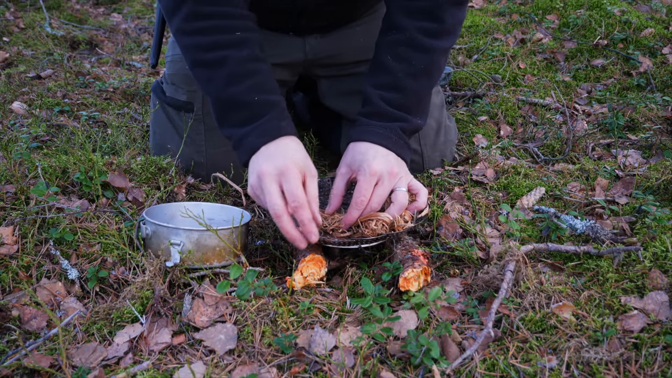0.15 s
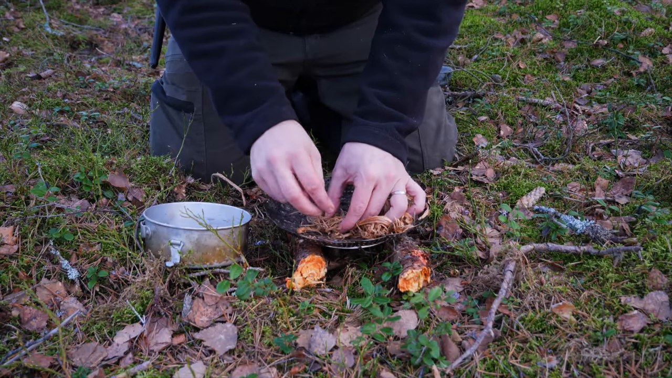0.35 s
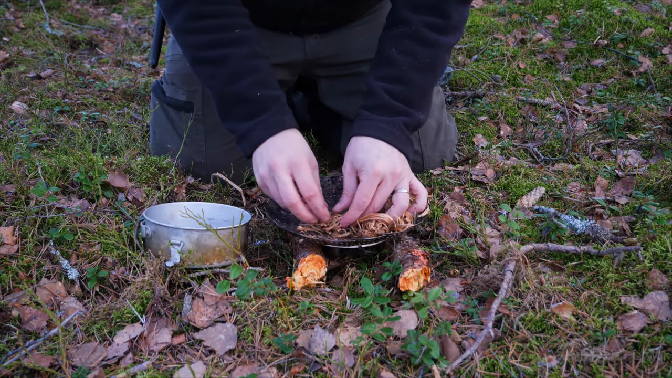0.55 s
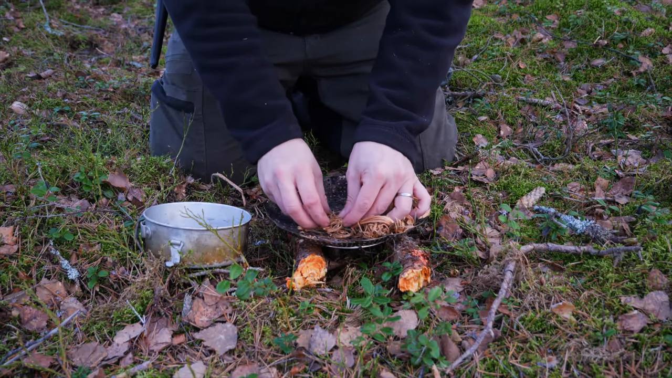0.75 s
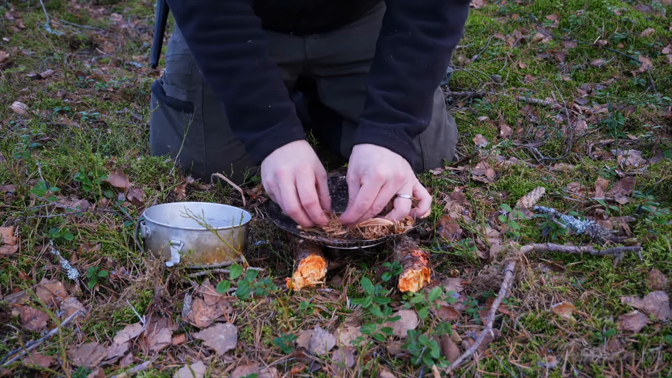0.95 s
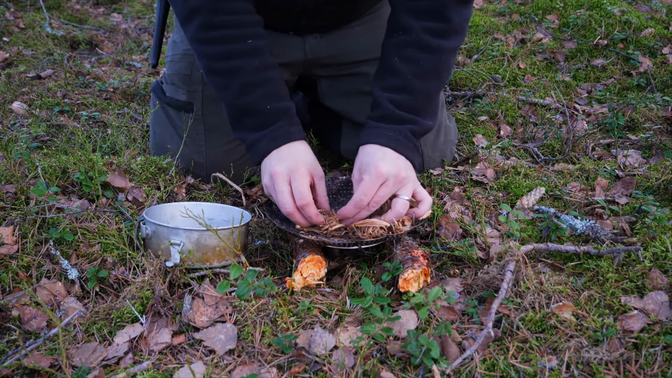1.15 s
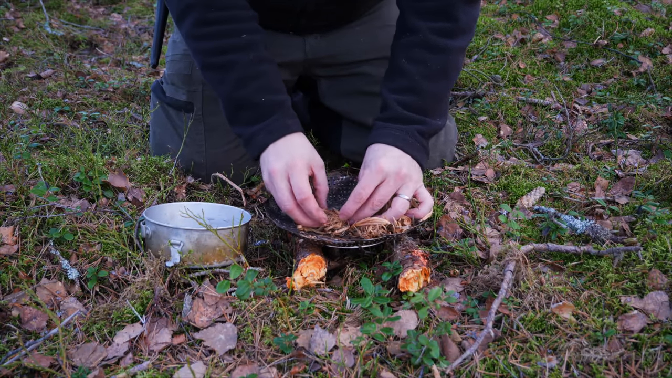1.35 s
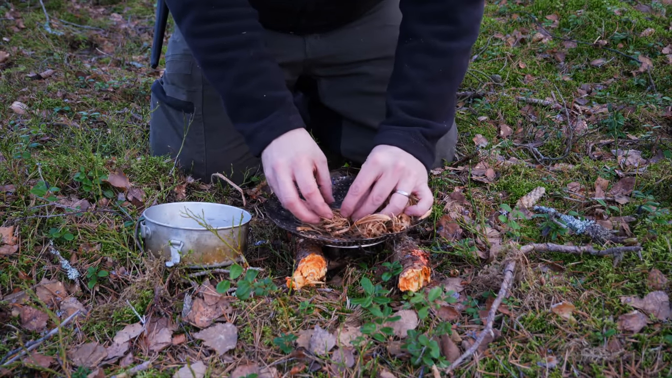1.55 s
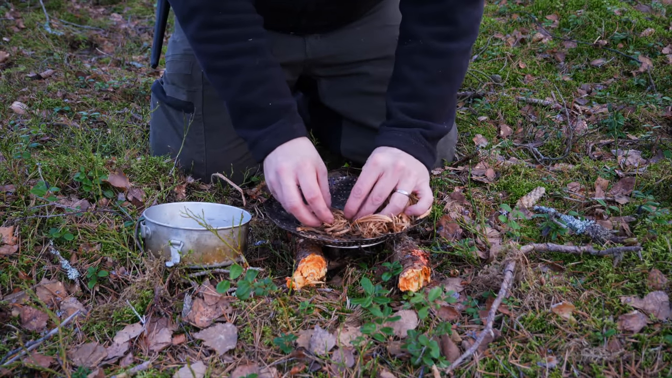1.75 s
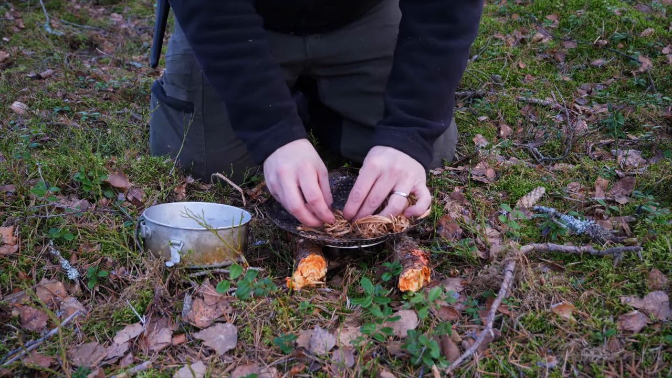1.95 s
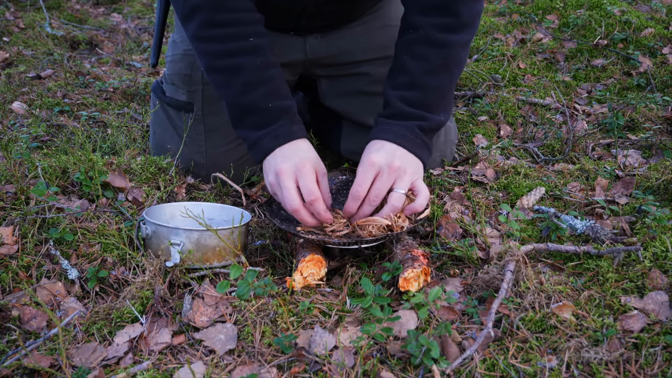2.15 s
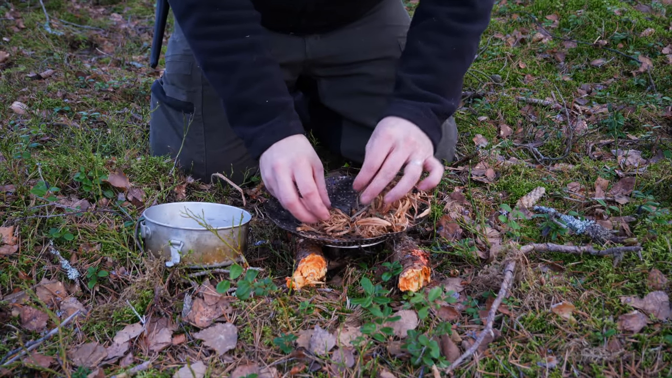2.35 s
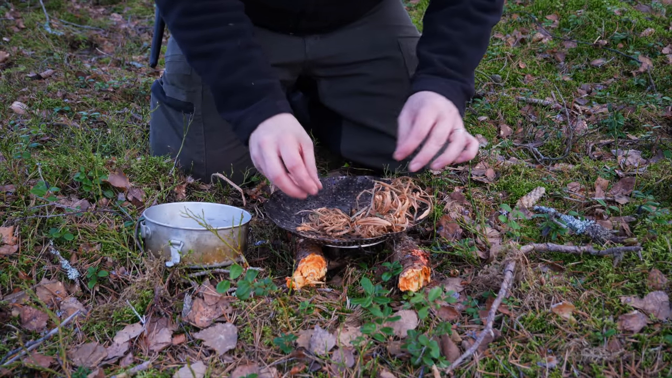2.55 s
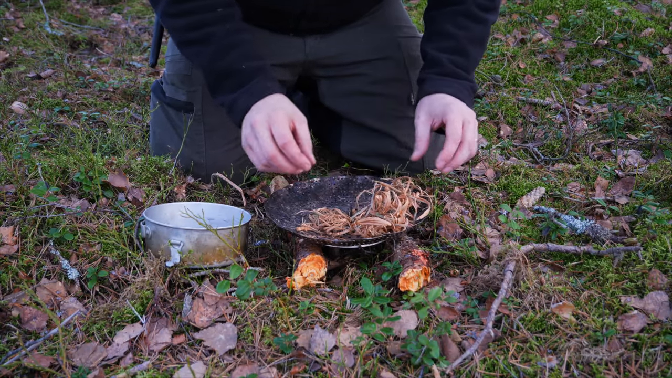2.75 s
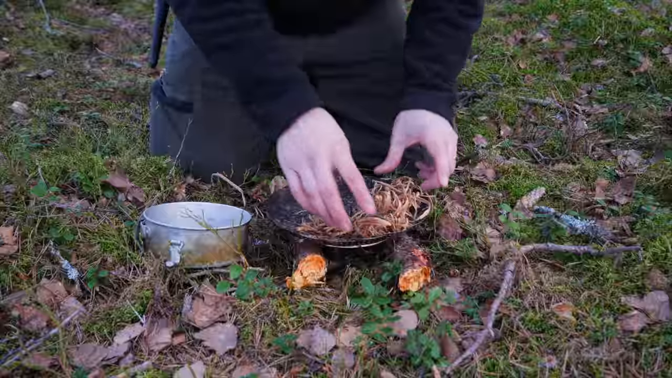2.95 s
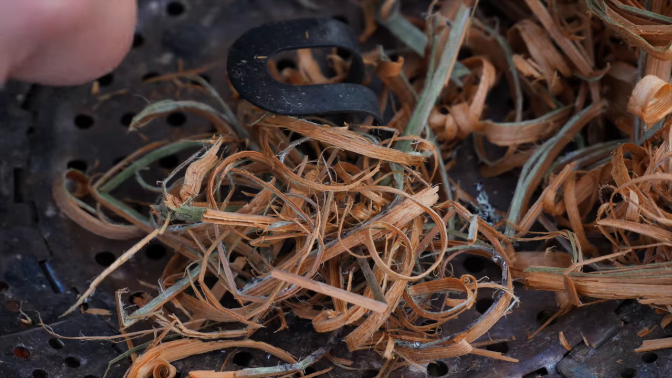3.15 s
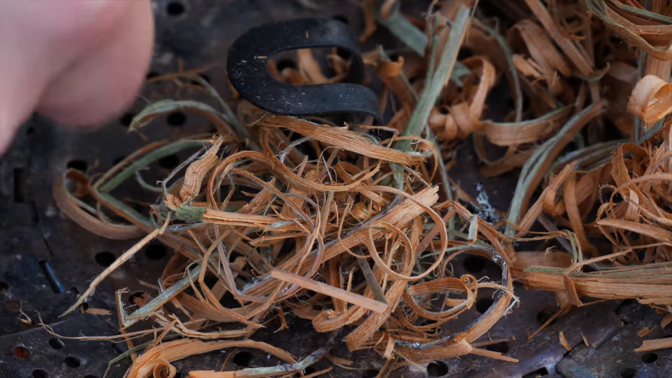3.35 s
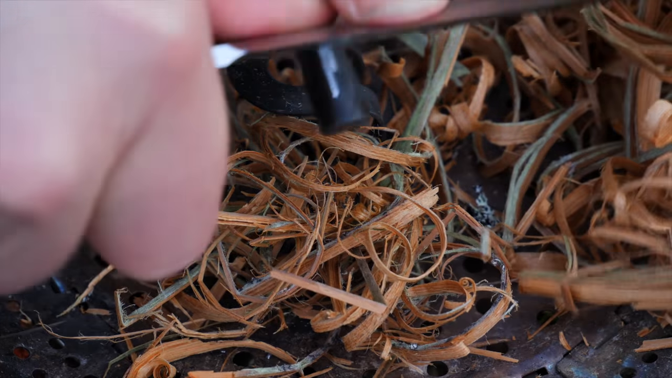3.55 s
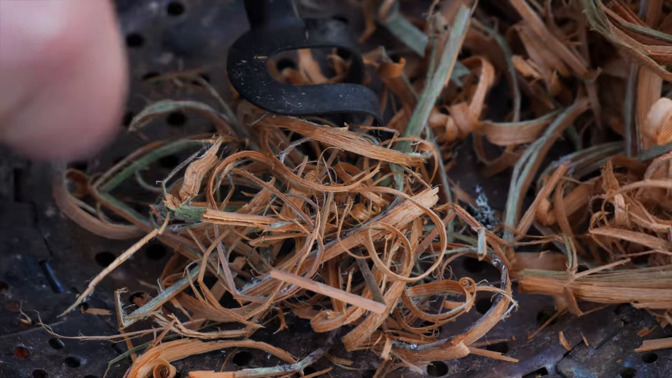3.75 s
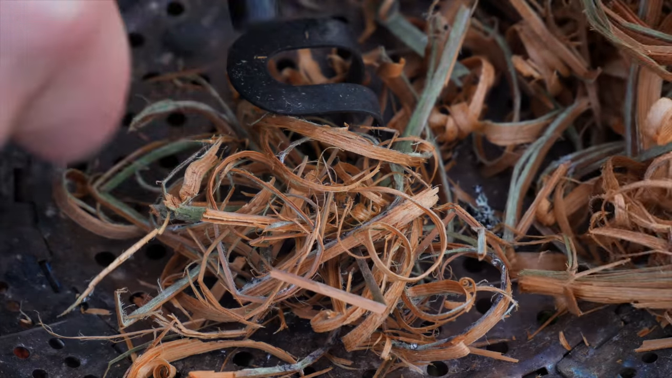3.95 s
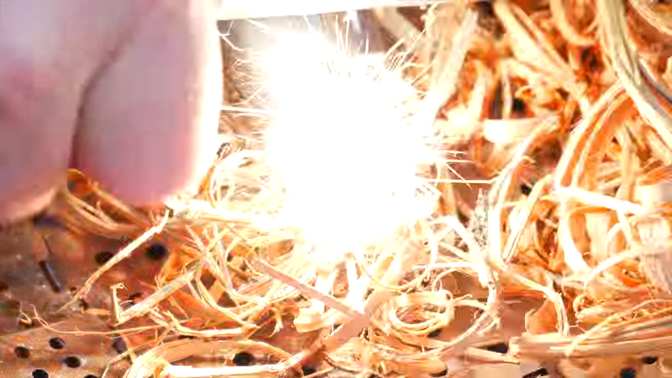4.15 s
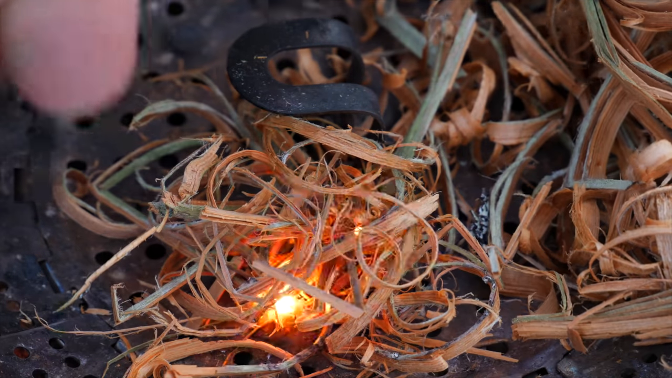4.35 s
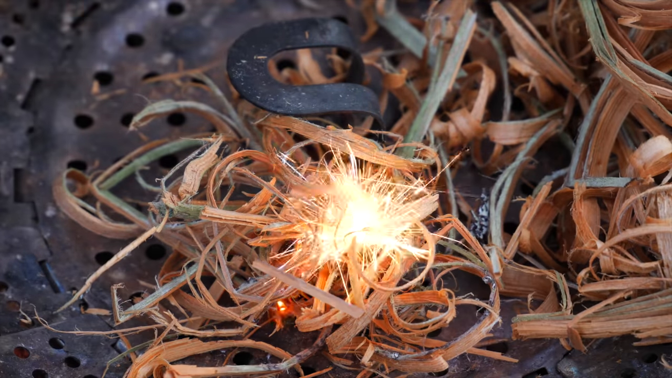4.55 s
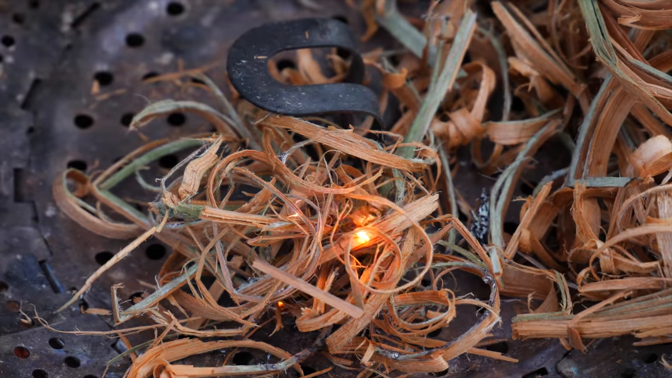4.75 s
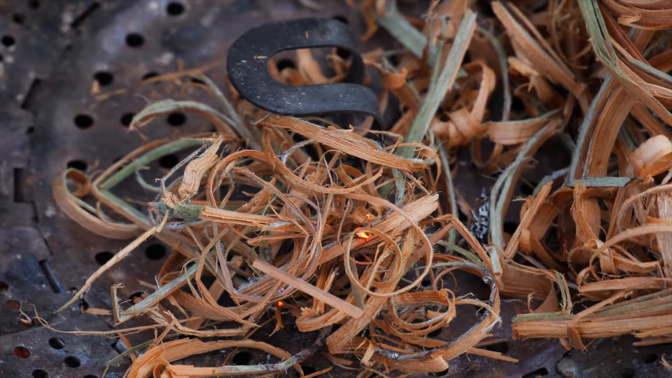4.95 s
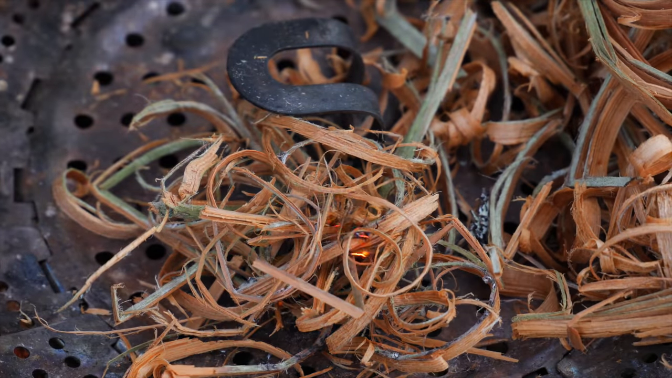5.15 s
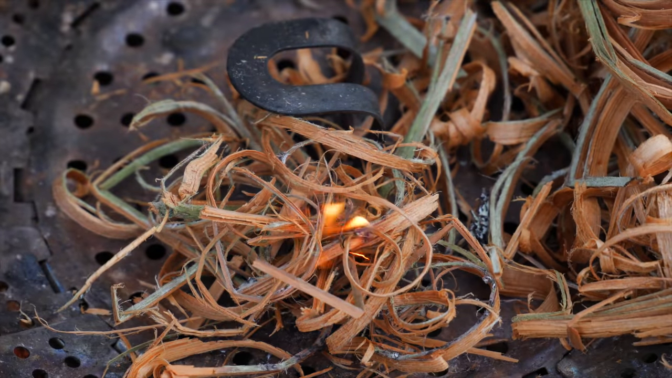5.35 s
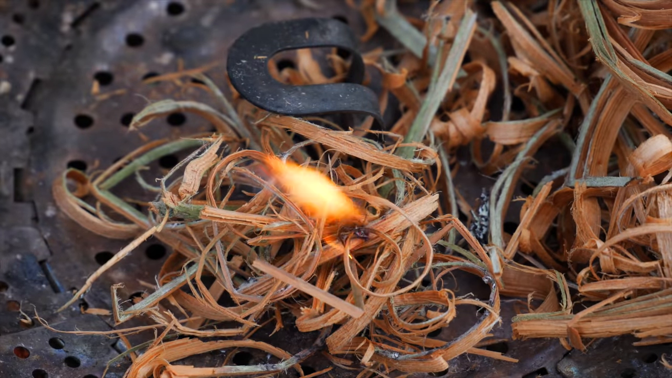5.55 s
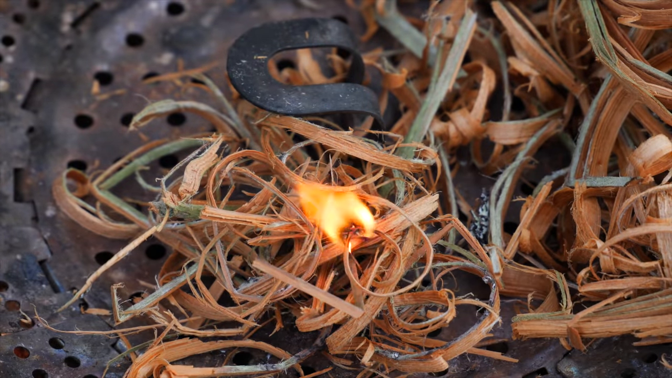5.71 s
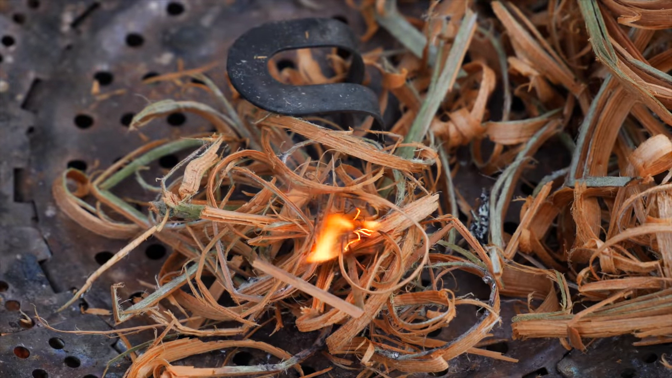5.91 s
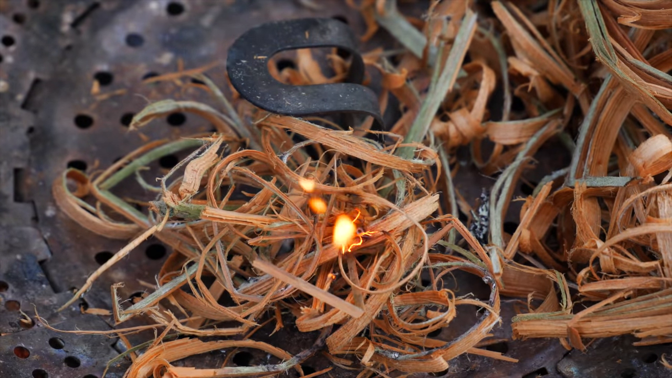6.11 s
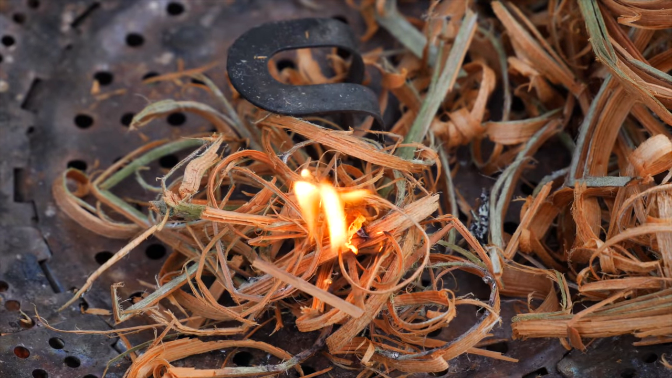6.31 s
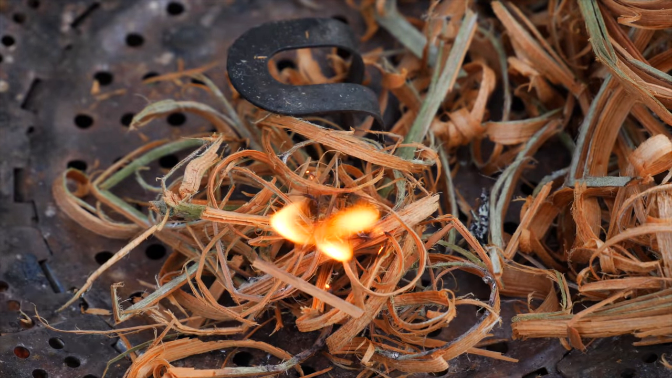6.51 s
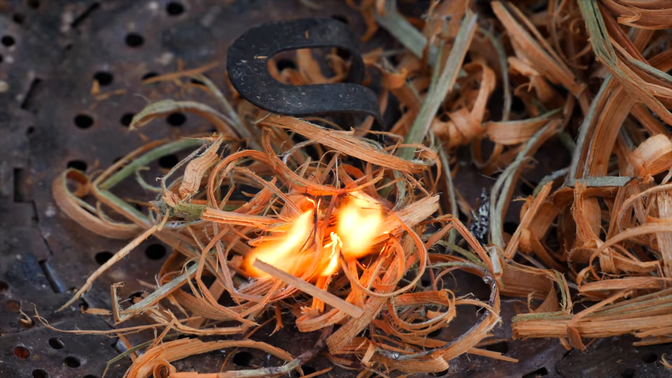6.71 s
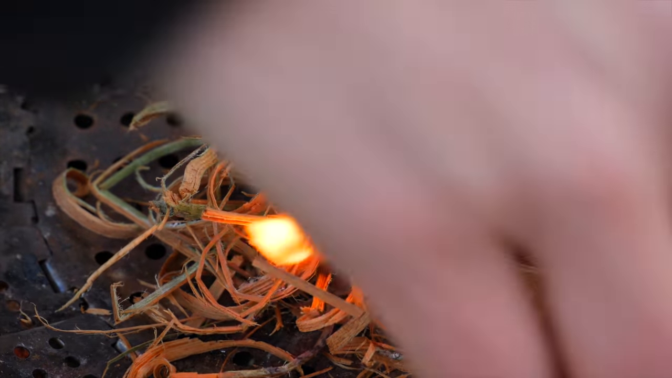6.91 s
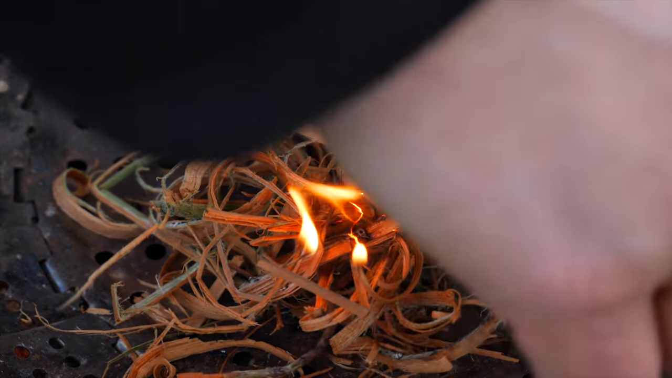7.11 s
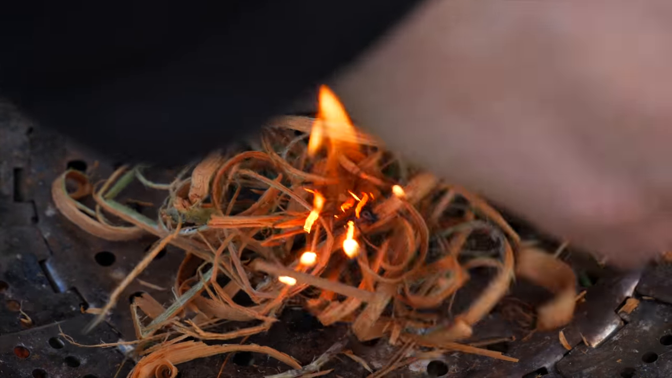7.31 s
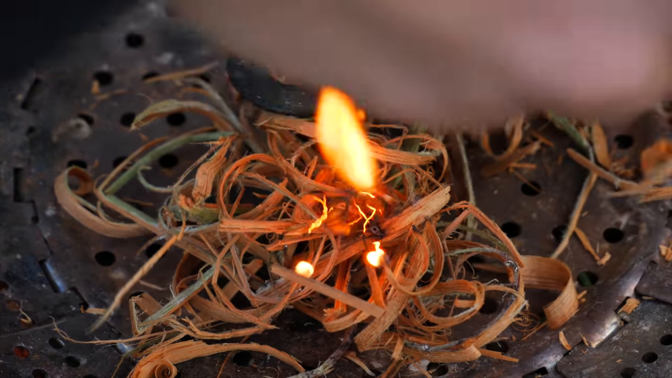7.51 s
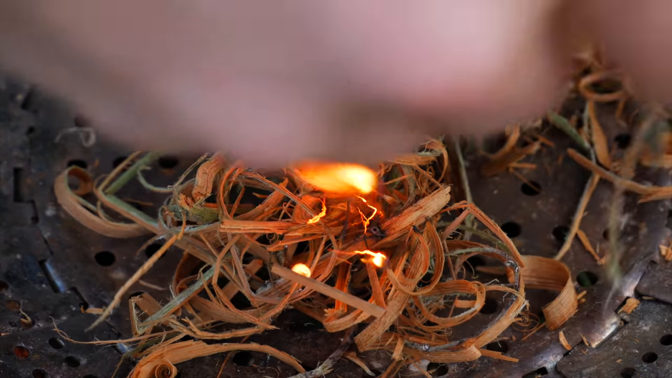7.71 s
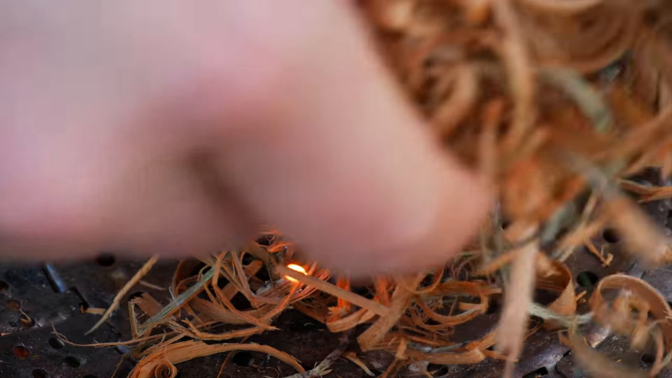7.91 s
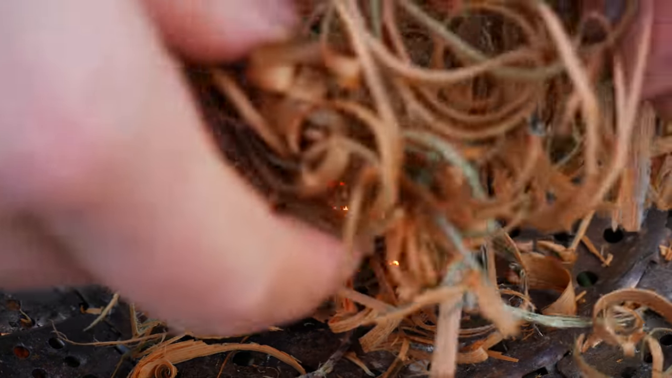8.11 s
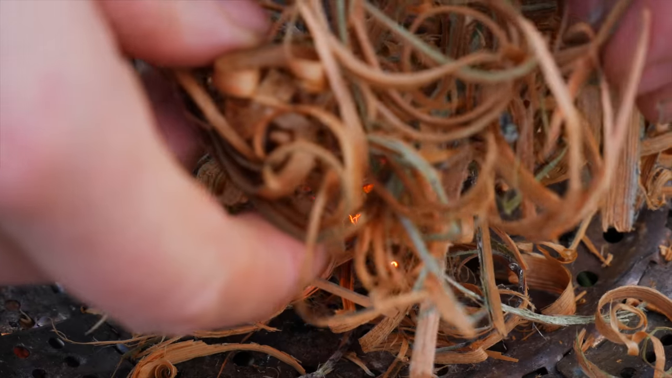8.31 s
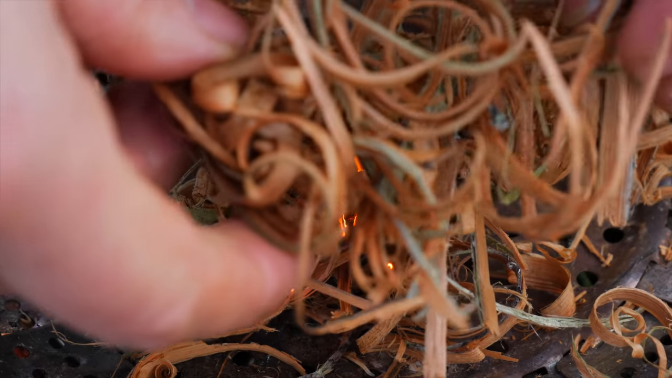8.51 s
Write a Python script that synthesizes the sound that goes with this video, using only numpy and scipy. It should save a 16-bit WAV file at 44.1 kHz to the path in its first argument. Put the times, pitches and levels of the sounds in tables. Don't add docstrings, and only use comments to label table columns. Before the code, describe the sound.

Soft crackly rustling of dry curls, sudden close stuttering metal scrapes and a spitting fizz, then a sharp clatter of dropped tools and light rustling.

```python
import sys
import numpy as np
from scipy import signal
from scipy.fft import rfft, irfft
from scipy.io import wavfile
from scipy.ndimage import uniform_filter1d, map_coordinates

SR = 44100
rng = np.random.default_rng(int(sys.argv[2]) if len(sys.argv) > 2 else 0)


def volts_from_decibels(level):
    exponent = np.asarray(level, float) / 20
    return 10 ** exponent


def to_wav(s):
    ch = np.atleast_2d(s).T
    pcm = np.round(np.clip(ch, -1, 1) * 32767)
    wavfile.write(sys.argv[1], SR, pcm.astype(np.int16))


N = 377927


def unit(x):
    return x / np.sqrt(np.mean(x ** 2) + 1e-20)


def white():
    return rng.standard_normal(N)


def coloured(x, spectrum):
    f, v = np.transpose(spectrum)
    hz = np.fft.rfftfreq(8192, 1 / SR)
    level_db = np.interp(np.log(hz + 1), np.log(f + 1), v, left=-60, right=-60)
    cepstrum = irfft(np.log(volts_from_decibels(level_db) + 1e-6))
    cepstrum[1:4096] *= 2
    cepstrum[4097:] = 0
    response = irfft(np.exp(rfft(cepstrum)))
    response = np.float32(response / np.linalg.norm(response))
    return signal.oaconvolve(x.astype(np.float32), response)[:N]


def wobble(rate_hz):
    step = max(1, int(SR / rate_hz / 8))
    coarse = np.arange(0, N + step, step)
    knots = rng.standard_normal(int(N * rate_hz / SR) + 4)
    return np.interp(np.arange(N), coarse, map_coordinates(knots, [coarse * rate_hz / SR]))


def grit(spiky_db, rate_hz):
    return unit(white() * volts_from_decibels(spiky_db * wobble(rate_hz)))


def patchy(x, depth_db=2.0):
    z = signal.stft(x.astype(np.float32), nperseg=256)[2]
    field = rng.standard_normal(z.shape, np.float32)
    field = uniform_filter1d(field, size=7, axis=0)
    field = uniform_filter1d(field, size=9, axis=1)
    return signal.istft(z * volts_from_decibels(depth_db * unit(field)), nperseg=256)[1][:N]


def gains(tables):
    t, out = np.arange(N) / SR, np.zeros((len(tables[0][0]) - 1, N))
    for rows in tables:
        s, *columns = np.transpose(rows)
        span = slice(round(s[0] * SR), round(s[-1] * SR))
        out[:, span] += volts_from_decibels([np.interp(t[span], s, c) for c in columns])
    return uniform_filter1d(out, size=60, axis=1)


def bursts(rows, rise_ms=1., fall_ms=1., sharp=1.4):
    t_ms, out = np.arange(-1500, 2500) / SR * 1000, np.zeros((2, N + 4000))
    for s, low_db, high_db, *shape in rows:
        rise, fall = [rise_ms, fall_ms][:2 - len(shape)] + shape
        swell_db = -6 * np.where(t_ms < 0, (t_ms / rise) ** 2, np.abs(t_ms / fall) ** sharp)
        out[:, round(s * SR):][:, :len(t_ms)] += volts_from_decibels(np.add.outer([low_db, high_db], swell_db))
    return out[:, 1500:N + 1500]


def pops(rows, sharpness):
    out = np.zeros((2, N))
    for s, low_db, high_db, *_ in rows:
        out[:, round(s * SR) - 20] = -sharpness * volts_from_decibels([low_db, high_db])
    return out


# (time [s], level [dB])
WIND = [(0.0, -58.5), (0.9, -61), (1.3, -64.5), (2.95, -63.5), (3.15, -59), (3.7, -48.5), (4.0, -54),
        (4.5, -46), (4.95, -50.5), (5.25, -58), (6.0, -56), (6.5, -52.5), (7.2, -52.5), (7.7, -61),
        (8.57, -63.5)]
# (frequency [Hz], density [dB per Hz])
BUFFET = [(5, -8.5), (15, 0.5), (45, -11), (90, -30)]
RUMBLE = [(35, -21), (70, 4.5), (130, -5), (300, -23)]
FOREST = [(88, -32), (150, -4), (814, -13), (1090, -15), (2650, -23.5), (15000, -28.5), (16500, -37)]
HUSH = [(150, -9), (500, 0.5), (1000, -3), (1800, -22.5)]
DRONE = [(380, -24), (460, 0), (560, -26)]
CUT_S = 3.06
BUFFET_FAR_DB, BUFFET_NEAR_DB = -68.5, 6


def outdoors():
    near = np.arange(N) > CUT_S * SR
    strength, = gains([WIND])
    buffet = np.where(near, volts_from_decibels(BUFFET_NEAR_DB) * strength, volts_from_decibels(BUFFET_FAR_DB)) * volts_from_decibels(1.9 * wobble(7.5))
    wind = buffet * coloured(white(), BUFFET)
    wind += strength * volts_from_decibels(2.06 * wobble(10)) * coloured(white(), RUMBLE)
    hush = volts_from_decibels(-66) * near * coloured(white(), HUSH)
    murmur = volts_from_decibels(-77) * ~near * coloured(white(), DRONE)
    return wind + hush + murmur + volts_from_decibels(-65) * coloured(white(), FOREST)


# (time [s], effort [dB])
RUSTLE = [
    [(0.0, -70.5), (0.3, -69), (0.475, -60.5), (0.615, -63.5), (1.368, -58.5), (1.914, -61.5), (1.967, -67),
     (2.418, -65), (2.76, -80)],
    [(2.76, -92), (3.05, -85), (3.1, -68.5), (3.22, -59.5), (3.387, -70), (3.45, -62.5)],
    [(4.9, -84), (5.064, -79), (5.148, -67.5), (5.355, -79.5), (5.494, -69.5), (5.671, -79.5), (5.88, -67)],
    [(5.88, -71), (5.935, -63), (6.023, -66.5), (6.05, -57.5), (6.147, -57.5), (6.21, -44.5), (6.62, -52.5),
     (6.75, -40.5), (6.82, -54)],
    [(6.82, -56), (6.948, -61.5), (7.07, -51), (7.11, -54.5), (7.15, -47), (7.185, -53.5), (7.24, -50.5),
     (7.262, -44.5), (7.31, -56)],
    [(7.31, -55), (7.4, -54), (7.547, -59.5), (7.739, -59.5), (8.035, -61.5), (8.57, -73)],
]
HANDFUL_DB = [-67, -60, -65, -56, -63, -64]
# (time [s], body [dB], crisp [dB])
SNAPS = [(0.8077, -62, -49), (1.0223, -51, -44), (1.0409, -48, -23), (1.1425, -62.0, -36),
         (1.1537, -52, -31.5), (1.3413, -56, -43), (1.3614, -59, -43), (1.4672, -47.5, -54.0),
         (1.698, -62, -54), (1.756, -60, -57), (1.8, -51, -54), (1.829, -55, -48), (1.843, -49.5, -40.5),
         (1.9976, -51, -50), (2.021, -56, -58), (2.112, -55, -57), (2.373, -54, -56), (2.391, -58, -53),
         (2.3213, -53, -47), (2.3303, -50.5, -48), (2.4219, -51, -47), (7.4823, -66, -40),
         (7.4996, -66, -40), (7.6552, -59, -42.5), (7.7608, -48.5, -43.5), (7.9838, -47.5, -36.5),
         (8.0148, -41.5, -44), (8.4727, -60, -51), (8.5686, -55, -41.5)]
# (time [s], peak [dB], body [dB], crisp [dB])
BRUSHES = [(3.1348, -50, -56, -60), (3.1348, -47, -54, -60), (3.2071, -49, -55, -55),
           (3.2325, -43, -51, -58), (3.3064, -42, -51, -57), (3.3932, -36, -37, -46)]
# (time [s], crisp [dB])
RATTLE = [(6.1236, -46), (6.1501, -41.5), (6.1915, -39), (6.197, -43), (6.2173, -35), (6.3315, -46),
          (6.408, -38), (6.4425, -39), (6.448, -36), (6.489, -43), (6.2335, -36), (6.2461, -36),
          (6.3536, -46), (6.4747, -45), (6.5014, -43), (6.568, -40), (6.63, -37), (6.6351, -33),
          (6.651, -42), (6.6665, -36), (6.6835, -43), (6.6885, -30), (6.701, -35), (6.708, -33),
          (6.712, -31), (6.718, -31), (6.729, -38), (6.7343, -31), (6.7439, -22), (6.759, -30),
          (6.765, -28), (6.778, -34), (6.832, -46)]
# (frequency [Hz], density [dB per Hz])
BODY = [(500, -23.5), (1100, 2), (2300, 0), (3400, -1.5), (4800, -3.5), (6000, -12.5), (8000, -36.5)]
CRISP = [(2650, -28.5), (4800, -12.5), (6690, -3), (8270, 2.5), (10100, -11), (12100, -3.5), (15600, -11),
         (16500, -26)]
PUSH = [(80, -2.5), (170, -4.5), (550, -5.5), (1500, -26)]
BODY_GROWS = 0.75
RATTLE_BODY_DB, RATTLE_GROWS = -42, 0.71


def shavings():
    rattle = [(s, RATTLE_BODY_DB + RATTLE_GROWS * (db + 37.5), db) for s, db in RATTLE]
    brushes = [(s, body_db + 4.5, crisp_db + 4.5) for s, _, body_db, crisp_db in BRUSHES]
    snaps = volts_from_decibels(-2.5) * bursts(SNAPS + brushes, rise_ms=0.23, fall_ms=0.83, sharp=0.9)
    snaps += volts_from_decibels(1.2) * bursts(rattle, rise_ms=0.62, fall_ms=1.12, sharp=0.92)
    ticks = (rng.random(N) < 45 / SR) * volts_from_decibels(4.4 * rng.exponential(size=N).clip(0, 3))
    tick_decay = volts_from_decibels(-60 * np.arange(600) / SR / 0.0095)
    crackle = 1 + 0.7 * signal.oaconvolve(ticks, tick_decay)[:N]
    hands = [[(s, full_db + BODY_GROWS * (db + 60), db) for s, db in rows]
             for rows, full_db in zip(RUSTLE, HANDFUL_DB)]
    rub = gains(hands) * volts_from_decibels(-2 + 2.2 * wobble(50))
    rubbing = rub * crackle * patchy(grit(1.44, 900))
    body, crisp = rubbing + snaps * np.sign(white()) + pops(SNAPS + rattle, sharpness=3.1)
    rumple = volts_from_decibels(-3) * rub[0] * volts_from_decibels(2.7 * wobble(25)) * coloured(white(), PUSH)
    return coloured(body, BODY) + coloured(crisp, CRISP) + rumple


# (time [s], length [s], peak [dB], chirp [Hz])
CREAK = [(0.454, .047, -39.5, 12600), (0.5185, .021, -43, 13970), (0.569, .018, -46.5, 15000)]
STICK_S = 0.0053


def creak():
    out, t = np.zeros(N), np.arange(400) / SR
    for s, length_s, db, hz in CREAK:
        slips, chance = np.zeros(N), rng.standard_normal((30, 2))
        after = STICK_S * (np.arange(len(chance)) + .2 * chance[:, 0].clip(-2, 2))
        held = after < length_s
        slips[((s + after[held]) * SR).astype(int)] = volts_from_decibels(db + 2.2 * chance[held, 1])
        chirp = volts_from_decibels(3.5 - 60 * t / .002) * np.sin(2 * np.pi * hz * t)
        ring = volts_from_decibels(-17 - 60 * t / 0.015) * np.sin(2 * np.pi * 3400 * t)
        out += signal.oaconvolve(slips, chirp + ring)[:N]
    return out


# (time [s], strength [dB], frequency [Hz])
SPIKES = [(4.4916, -5, 4500), (6.2526, -1, 4200), (6.2888, -8, 3800), (6.4561, -13, 5800),
          (6.765, -6, 7000), (1.0405, -34, 3500)]


def pressure_spikes():
    out, t = np.zeros(N), np.arange(200) / SR
    for s, db, hz in SPIKES:
        out[round(s * SR):][:len(t)] -= volts_from_decibels(db) * np.sin(2 * np.pi * hz * t) * np.exp(-2.6 * hz * t)
    return out


def knocks(rows, modes, held_hz=20000, spread_db=2.0):
    ring, crack, t = np.zeros(N + SR), np.zeros(N + SR), np.arange(SR // 6) / SR
    for s, db, pitch, lasting, crack_db in rows:
        at = slice(round(s * SR), round(s * SR) + len(t))
        for hz, level_db, t60_s in modes:
            scale, slow = (pitch, lasting) if hz < held_hz else (1, 1)
            fade_db = db + level_db + spread_db * rng.standard_normal() - 60 * t / (t60_s * slow)
            ring[at] += volts_from_decibels(fade_db) * np.sin(2 * np.pi * hz * scale * t) * (1 - np.exp(-t / .00015))
        crack[at] += volts_from_decibels(db + crack_db - 60 * t / (0.019 * lasting)) * rng.standard_normal(len(t))
    return np.array([ring[:N], crack[:N]])


# (time [s], peak [dB], pitch factor, ring-time factor, crack [dB])
GRATE_KNOCKS = [(1.5625, -50.5, 0.95, 0.9, -3), (1.572, -53, 0.97, 0.93, -6), (1.84, -57, 1.15, 0.54, -1)]
FUMBLE_KNOCKS = [(5.908, -54, 1, 1, -8), (5.921, -52, 1, 1, -6), (5.93, -53, 0.97, .8, -8),
                 (5.94, -53, 0.99, 1, -3)]
HANDLE_KNOCKS = [(6.0918, -16, 0.99, 0.98, -11), (6.1045, -30, 0.95, 0.83, -5),
                 (6.1791, -30.5, 0.96, 1.4, -16), (6.2015, -20, 0.99, 0.65, -18.5),
                 (6.3715, -23, 0.95, 1.1, -13), (6.3805, -26, 0.94, 3.1, -5), (6.385, -33, 1.1, .8, -3),
                 (6.748, -31, 0.92, 1, -3), (6.7705, -29, .97, 2.4, -8)]
STEEL_KNOCKS = [(6.2527, -16.5, 1., 0.91, 1), (6.7418, -21.5, 1.05, 1.35, 4.5), (6.747, -23, 0.97, 0.81, 5),
                (6.771, -30, 0.98, 1.2, -6)]
SHANK_KNOCKS = [(6.2855, -33, 0.89, .55, -4), (6.2888, -22, 1, .55, -1), (6.2935, -33, 1, .55, -8),
                (6.297, -30, 1.01, .55, -6), (6.3035, -30, .99, .55, -9), (6.308, -31, 1.01, .55, -8),
                (6.3165, -29, 0.98, .55, -6)]
TIP_KNOCKS = [(6.456, -25.5, 1.005, 0.95, -4.5), (6.4655, -40, 1.2, .5, -6)]
LINK_KNOCKS = [(7.0665, -37.5, 1., 0.88, 2.7), (7.07, -42, 1.01, .8, 5.5), (7.074, -48, .99, 1, 8),
               (7.254, -52, 0.9, 0.62, 8), (6.7695, -27, 0.92, 0.2, 6)]
# (frequency [Hz], level [dB], t60 [s])
GRATE = [(710, 1, 0.053), (1070, -7, .1), (1290, -6, 0.056), (1680, -14, .06)]
FUMBLE = [(2256, 1, .07), (3100, -8, .06), (5103, -3, 0.054), (6110, -2, 0.056), (8700, -6, .05)]
HANDLE = [(1087, -28, 0.14), (2240, 0, 0.046), (3000, -16, .03), (3390, -15, .012), (5120, -13, 0.049),
          (5680, -24, .04), (6850, -22, .04), (8700, -19.5, 0.023)]
STEEL = [(2100, -16, 0.07), (3040, -1, 0.032), (4230, -7, 0.048), (5180, -13, 0.041), (5870, 0, 0.0084)]
SHANK = [(2310, -1, .025), (3020, -8, .03), (3500, 2, .025), (4300, -7, .012), (5650, -15, .015)]
TIP = [(5100, -13, 0.043), (5750, 0.5, .016), (7000, 0, 0.013), (8600, -12, .01)]
LINK = [(3000, -6, .05), (4600, -10, .04), (8170, 6.5, 0.048), (10340, 1, 0.022), (11500, 2, 0.047),
        (13300, -9, .03)]
# (frequency [Hz], density [dB per Hz])
CRACK = [(350, -20), (2500, -2), (5000, -1.5), (6500, -3.5), (8500, -13.5), (14000, -29)]


def tools():
    ring, crack = knocks(HANDLE_KNOCKS, HANDLE, held_hz=2700)
    for rows, modes in [(GRATE_KNOCKS, GRATE), (FUMBLE_KNOCKS, FUMBLE), (STEEL_KNOCKS, STEEL),
                        (SHANK_KNOCKS, SHANK), (TIP_KNOCKS, TIP), (LINK_KNOCKS, LINK)]:
        more_ring, more_crack = knocks(rows, modes)
        ring += more_ring
        crack += more_crack
    t = np.arange(SR // 2) / SR
    thump = volts_from_decibels(-29.5 - 60 * t / 0.5) * np.sin(2 * np.pi * 72 * t) * (1 + 0.55 * np.cos(2 * np.pi * 15 * t))
    thump += volts_from_decibels(-31.5 - 60 * t / 0.07) * (np.sin(2 * np.pi * 320 * t) + np.sin(2 * np.pi * 190 * t))
    ring[round(6.742 * SR):][:len(t)] += thump * (1 - np.exp(-t / 0.0033))
    return ring + coloured(crack, CRACK)


# (time [s], edge over rod [dB])
BITE = [(3.75, -10), (3.8, -8), (3.85, -3.5), (3.88, -6.5), (4.0, -3.5), (4.03, -14), (4.072, -4.5),
        (4.11, -14), (4.15, -3.5), (4.2, 3), (4.22, 0), (4.27, 5.5), (4.35, 1.5), (4.37, -8)]


def bite_db(s):
    return np.interp(s, *np.transpose(BITE))


# (time [s], rod [dB], length
# [ms])
STICK_SLIPS = [(3.395, -45.5, 1.1), (3.4094, -41.5, 1.8), (3.4242, -36.5, 1.4), (3.445, -46, 1),
               (3.4556, -31.5, 1.4), (3.4708, -32, 1.3), (3.4766, -34.5, 1.4), (3.4826, -37.5, 1.7),
               (3.4914, -35, 1.1), (3.497, -38, 1), (3.5036, -34, 1.5), (3.54, -33.5, 1.4), (3.554, -30, 2.4),
               (3.5665, -30, 3), (3.582, -31, 2.7), (3.5947, -26, 1.7), (3.6089, -22, 1.3), (3.6262, -20, 1.7),
               (3.6388, -26.5, 1.24), (3.6655, -31, 1.4), (3.671, -40, 1.3), (3.7108, -23, 1.94),
               (3.722, -21, 0.98), (3.7265, -25.5, 1.3), (3.731, -26, 1.4), (3.739, -31.5, 2.2),
               (3.745, -31, 1.6), (3.9364, -59.5, 21),
               (3.9986, -34.5, 3.9), (4.013, -33, 2.7), (4.0254, -38.5, 2.4), (4.0328, -33.5, 1.8),
         (4.0402, -30.5, 2.1), (4.049, -27.5, 1.9), (4.06, -28, 2.5), (4.0677, -22, 2.4), (4.074, -28, 2),
         (4.0793, -23.5, 2.1), (4.087, -26.5, 2.5), (4.104, -31, 2.5), (4.116, -28.5, 2.8),
         (4.1256, -26, 1.3), (4.1302, -24, 1.8), (4.1393, -22.5, 2.6), (4.148, -26.5, 3), (4.162, -28, 2),
         (4.1742, -25, 1.9), (4.187, -25.5, 2.4), (4.2, -29, 4), (4.2088, -21.5, 2.6), (4.2265, -27, 1.5),
         (4.2316, -23, 3), (4.2445, -24.5, 3.3), (4.252, -29, 2.5), (4.2615, -23, 3.7), (4.269, -27, 2.8),
         (4.278, -26, 3.3), (4.286, -30, 2.8), (4.2944, -31.5, 2.6), (4.317, -32.5, 1.4),
         (4.358, -38.5, 2.8)]
# (time [s], pressure [dB])
STROKES = [
    [(3.45, -42), (3.51, -51), (3.535, -60.5)],
    [(3.535, -54.5), (3.6, -50)],
    [(3.722, -40), (3.748, -43), (3.757, -55)],
    [(3.803, -46.5), (3.815, -41), (3.862, -41.5), (3.872, -46), (3.892, -48), (3.912, -60)],
    [(3.98, -54), (3.99, -41), (4.03, -42), (4.075, -35), (4.092, -42), (4.215, -39.5), (4.24, -32),
     (4.29, -36.5), (4.335, -50.5)],
    [(4.335, -62.5), (4.367, -43.5), (4.414, -44), (4.475, -56), (4.527, -61)],
]
# (time [s], fizz [dB], fall [ms])
SPARKS = [(4.4927, -26.5, 0.5), (4.5294, -18.5, 1.6), (4.535, -24, 1.2), (4.538, -25.5, 1.2),
          (4.5412, -22.5, 1.2), (4.544, -25, .8), (4.552, -25.5, 1.2), (4.5637, -18.5, 1.1),
          (4.57, -27, 2.6), (4.59, -30, 2), (4.609, -30, 3), (4.6287, -26, 3.8), (4.6494, -31, 3.3),
          (4.655, -27.5, 2.5), (4.666, -29.5, 1.5), (4.6752, -34, 1), (4.7098, -40, 1.8),
          (4.7276, -43, 1.6), (4.7832, -42, 3.4), (4.7997, -42, 3), (4.813, -40, .82),
          (4.8561, -43.5, 0.53), (4.8901, -39, .4)]
# (time [s], fizz [dB])
SIZZLE = [
    [(3.066, -43.5), (3.095, -50)],
    [(4.527, -33.5), (4.548, -36), (4.6, -34.5), (4.67, -34), (4.72, -51), (4.888, -56)],
]
FALL_SHARE = 0.8
SPARK_BODY_DB = -7


def contacts():
    slips = [(s, db, db + bite_db(s), ms, FALL_SHARE * ms) for s, db, ms in STICK_SLIPS]
    sparks = [(s, db + SPARK_BODY_DB, db, ms) for s, db, ms in SPARKS]
    pressure, = gains(STROKES)
    drag = pressure * volts_from_decibels([np.zeros(N), bite_db(np.arange(N) / SR)])
    drag = drag + gains(SIZZLE) * volts_from_decibels([[SPARK_BODY_DB], [0]])
    single = bursts(slips, sharp=1.15) + bursts(sparks, rise_ms=0.42, sharp=0.9)
    rod, edge = np.hypot(drag * volts_from_decibels(2.34 * wobble(160)), single)
    thud, spit = pops(sparks, sharpness=3.4)
    return rod, edge, thud, spit


# (time [s], rod ring [Hz])
GRIP = [(3.4, 2020), (3.8, 2250), (4.03, 1990), (4.07, 2340), (4.13, 2160), (4.33, 2150), (4.36, 3000),
        (4.47, 2050)]
# (frequency [Hz], density [dB per Hz])
ROD = [(250, -22), (1090, -7), (2070, -2), (2430, 0.5), (3430, -19.5), (4300, -14), (6000, -20.5),
       (7800, -59.5)]
EMBER = [(150, -13), (1500, -1), (4000, -8), (6500, -22)]
CHATTER = [(2650, -31.5), (4500, -5), (6240, -10), (8400, 0.5), (10100, -11), (12600, -9.5), (15100, -18),
           (16500, -34)]
FIZZ = [(2650, -28), (4600, -12), (5800, -17), (6600, -2.5), (8270, 3), (10100, -6.5), (12100, -4.5),
        (16500, -12)]
BUTT_HZ, BUTT_DB = 1130, -3.5


def scraper():
    t = np.arange(N) / SR
    rod, edge, thud, spit = contacts()
    shove = volts_from_decibels(-16.5) * uniform_filter1d(edge + 0.2 * rod, size=1200) * coloured(white(), PUSH)
    body = rod * patchy(grit(3.1, 1500)) + thud
    scraping = (t > 3.1) & (t < 4.48)
    drag, ember = body * scraping, body * ~scraping
    short = np.clip((np.interp(t, *np.transpose(GRIP)) - 1900) / 1100, 0, 1) * np.pi / 2
    ring = coloured(drag * np.cos(short), ROD)
    ring += coloured(drag * np.sin(short), [(1.23 * hz, db) for hz, db in ROD])
    butt = signal.lfilter(*signal.iirpeak(BUTT_HZ, 4.5, SR), drag * (t < 3.78))
    ring = ring + volts_from_decibels(BUTT_DB) * 4 * butt + coloured(ember, EMBER)
    hiss = edge * patchy(grit(2.5, 3000)) + spit
    burning, cutting = t > 4.48, (t > 4.17) | (t < 3.1)
    hiss = (coloured(hiss * (cutting & ~burning), CRISP) + coloured(hiss * burning, FIZZ)
            + coloured(hiss * ~cutting, CHATTER))
    return ring + hiss + shove


# (time [s], peak [dB], frequency [Hz], t60 [s])
GLINTS = [(5.895, -58, 3000, .05), (5.988, -52, 1330, .13), (6.035, -51, 550, .04),
          (6.2575, -27, 13200, .005), (6.386, -37, 5000, .04), (6.635, -28, 3000, .01),
          (6.688, -22, 6700, .008), (6.743, -18, 7700, .014), (6.7695, -18, 7500, .011),
          (6.771, -32, 2950, .035), (7.067, -46, 1600, .04), (6.408, -38, 12600, .012),
          (7.05, -56, 1690, .05), (7.075, -48, 2980, .05), (7.118, -50, 11500, .04), (7.15, -52, 1690, .05),
          (7.2, -50, 2980, .05), (7.211, -44, 11700, 0.054), (7.222, -48, 8200, .05),
          (7.224, -47, 11500, .04), (7.258, -46, 10200, .03), (7.268, -46, 8300, .04),
          (7.275, -51, 2980, .05)]


def glints():
    out, t = np.zeros(N), np.arange(SR // 10) / SR
    for s, db, hz, t60_s in GLINTS:
        ring = volts_from_decibels(db - 60 * t / t60_s) * np.sin(2 * np.pi * hz * t)
        out[round(s * SR):][:len(t)] += ring * (1 - np.exp(-t / 0.00045))
    return out


def scene():
    mono = outdoors() + shavings() + creak() + pressure_spikes() + tools() + scraper() + glints()
    return mono + np.outer([.018, -.018], np.gradient(mono))


def top_cut(x):
    return signal.sosfilt(signal.butter(12, 17010, fs=SR, output="sos"), x)


TOP_HZ = 16150


def record(dry):
    band_limit = signal.cheby2(12, 30, TOP_HZ, fs=SR, output="sos")
    mix = signal.sosfilt(band_limit, dry)
    return top_cut(mix)


dry = scene()
out = record(dry)
to_wav(out)
```